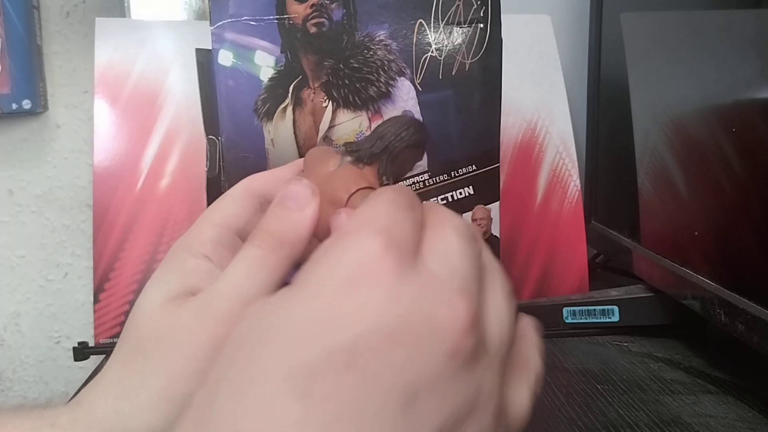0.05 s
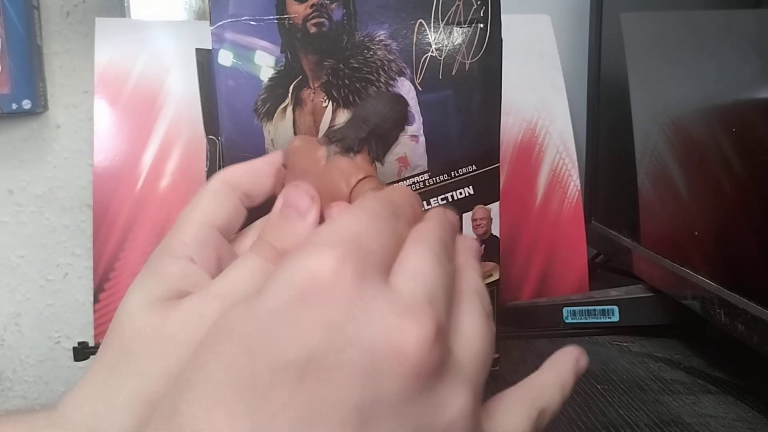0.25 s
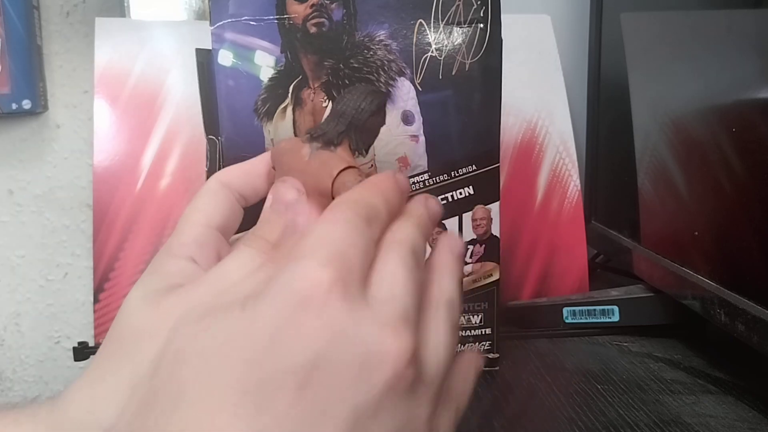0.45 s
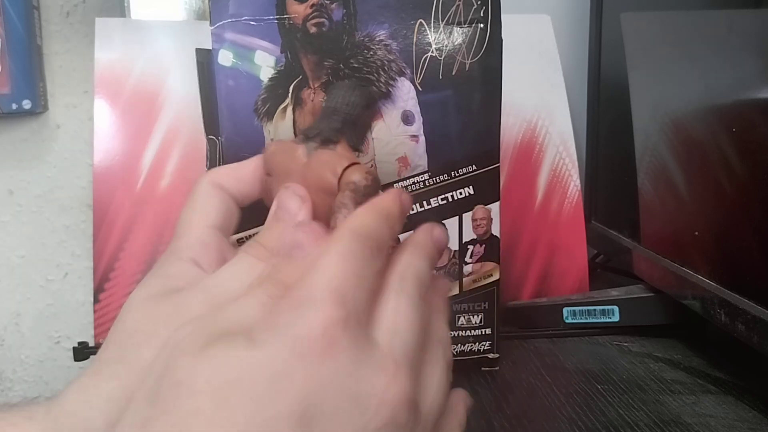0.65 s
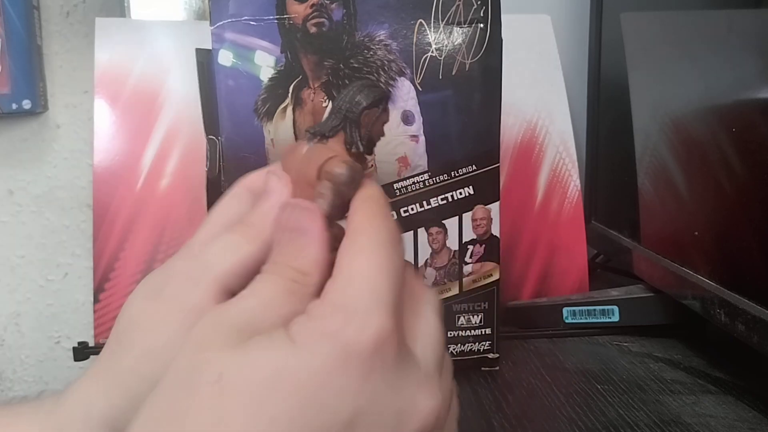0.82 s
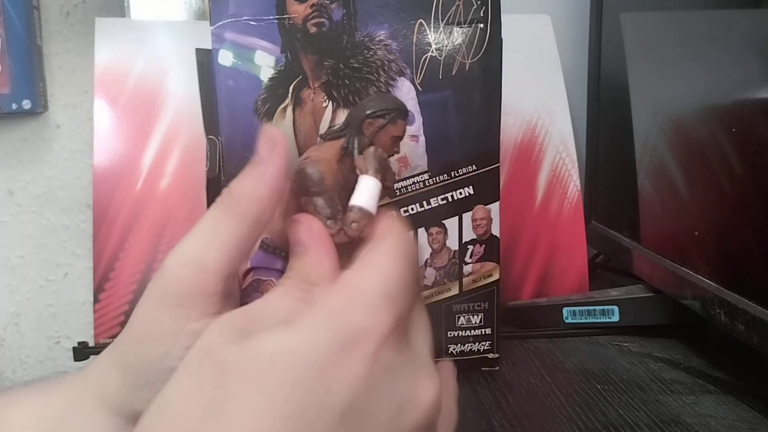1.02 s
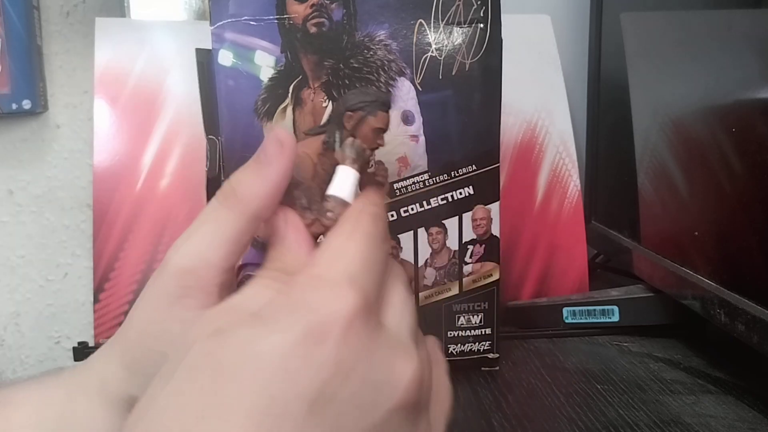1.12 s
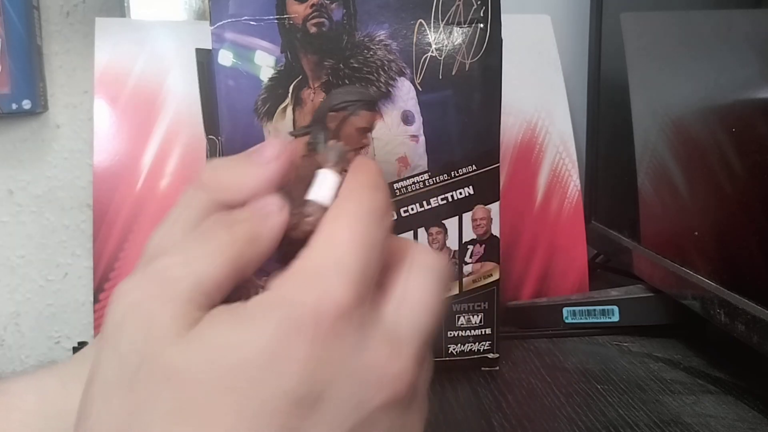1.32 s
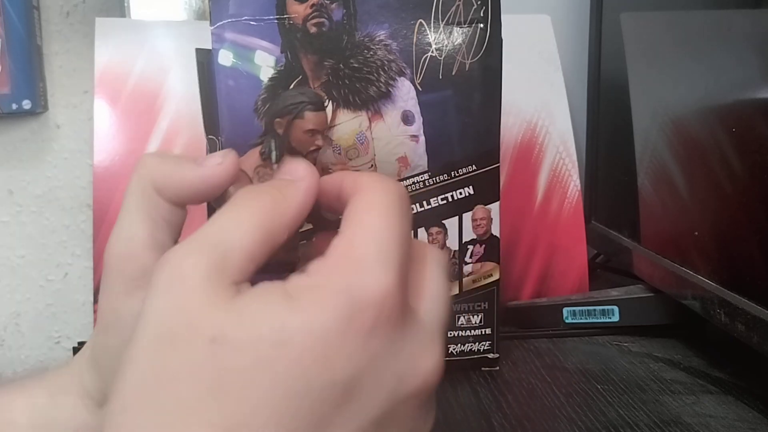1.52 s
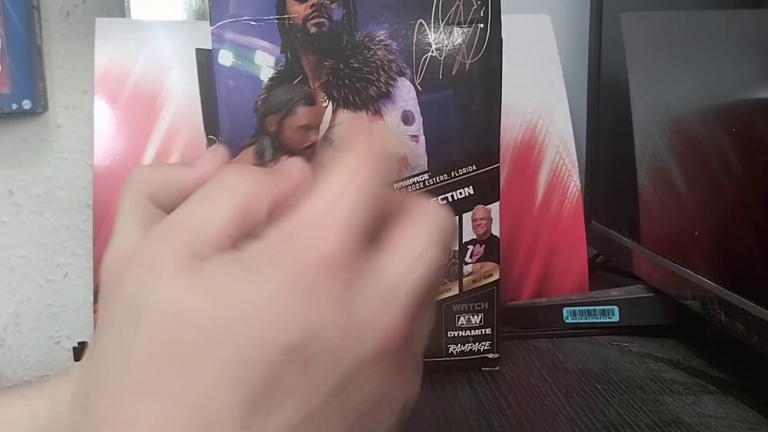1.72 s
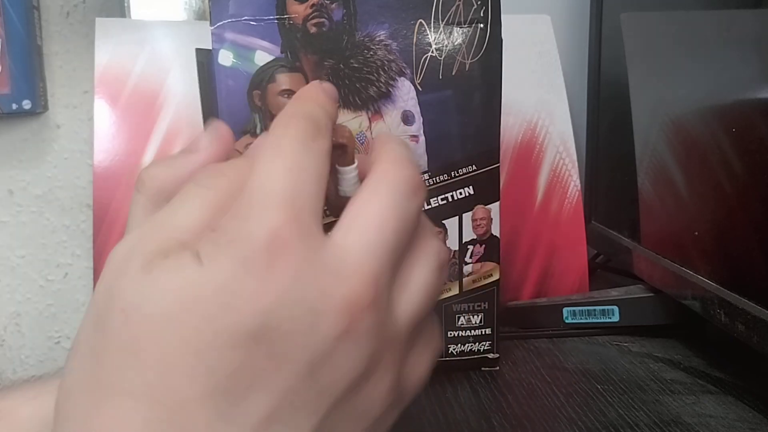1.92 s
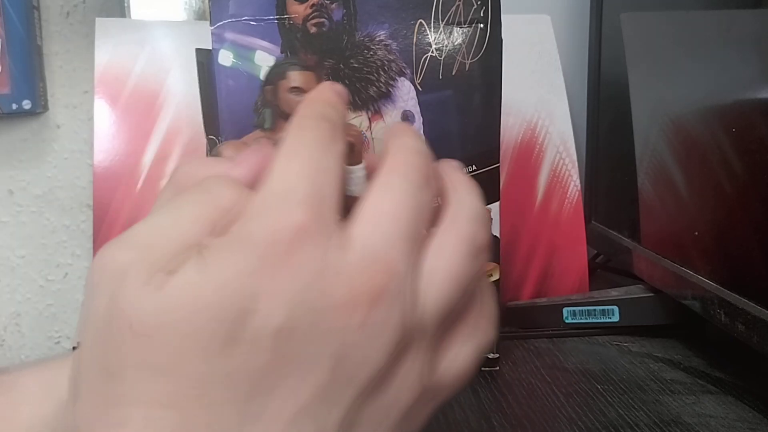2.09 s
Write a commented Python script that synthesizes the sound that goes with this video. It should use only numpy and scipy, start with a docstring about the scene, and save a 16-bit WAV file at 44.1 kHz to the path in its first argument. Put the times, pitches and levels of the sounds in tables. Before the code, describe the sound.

Plastic toy figure joints click sharply as hands turn them, with dull bumps on a desk

```python
"""Stiff joints of a plastic toy figure snap with short bright clicks as hands turn them in a small quiet room.
Each snap is four quick slips that set the figure's own pitches ringing. Hands and figure also bump the desk
just below, whose low modes reach the microphone through its stand. Fingers slide on the plastic as many tiny
slips, and something creaks faintly as a gliding tone. Feedback delays make the echo of the room, and
coloured noise makes the room rumble and microphone hiss underneath."""
import sys
import numpy as np
from scipy import signal
from scipy.fft import rfft, irfft, next_fast_len
from scipy.io import wavfile

SR = 44100
rng = np.random.default_rng(int(sys.argv[2]) if len(sys.argv) > 2 else 0)


def ratio_of_db(decibels):
    """Turn decibels (scalar or array-like) into linear amplitude factors; 0 dB maps to 1."""
    return 10 ** (np.asarray(decibels, float) / 20)


def waveform_to_disk(signal):
    """Save audio, clipped to [-1, 1], as 16-bit WAV at the path in sys.argv[1]."""
    frames = np.transpose(np.atleast_2d(signal))
    scaled = np.clip(frames, -1, 1) * 32767
    samples = np.round(scaled).astype(np.int16)
    wavfile.write(sys.argv[1], SR, samples)


N = 94815  # length of the scene [samples]


def rms_one(x):
    """Scale a sound to an rms (average strength) of 1."""
    return x / np.sqrt(np.mean(x ** 2) + 1e-20)


def in_time(rows):
    """Read a level curve at every sample, with straight lines between its points."""
    times_s, levels_db = np.transpose(rows)
    return np.interp(np.arange(N) / SR, times_s, levels_db)


def at_hz(points, hz):
    """Read a curve over frequency, with straight lines on a logarithmic frequency scale."""
    curve_hz, values = np.transpose(points)
    return np.interp(np.log(hz), np.log(curve_hz), values)


def ring(force, hz, t60):
    """A mode is a dying sine: a unit impulse starts it at height 1 and it falls 60 dB in t60 seconds."""
    decay = ratio_of_db(-60 / (t60 * SR))
    turn = 2 * np.pi * hz / SR
    return signal.lfilter([0, np.sin(turn)], [1, -2 * decay * np.cos(turn), decay * decay], force + 1e-18)


# how far high modes, and low ones, reach one microphone late [cycles]: more so through the air
EAR_SHIFT_CYCLES, STAND_SHIFT_CYCLES, AIRBORNE_HZ = 0.15, 0.024, 500


def strike(at, shapes, hz, t60, shift):
    """Lay pushes down at their samples and ring one mode, which reaches one microphone a little late."""
    force = np.zeros(N + 2000)
    np.add.at(force, at, shapes)
    ringing = ring(force[:N], hz, t60)
    cycles = EAR_SHIFT_CYCLES if hz > AIRBORNE_HZ else STAND_SHIFT_CYCLES
    lag = shift * SR / hz * cycles / 2  # half on each side
    n = np.arange(N)
    return np.array([np.interp(n - lag, n, ringing), np.interp(n + lag, n, ringing)])


def grains(per_s, spread_db, shape):
    """Tiny impulses at random moments, with uneven sizes and either sign."""
    sizes_db = spread_db * np.minimum(rng.exponential(1, shape), 4)
    sizes = ratio_of_db(sizes_db) * rng.choice([-1, 1], shape)
    return sizes * (rng.random(shape) < per_s / SR)


# how alike left and right are: (frequency [Hz], likeness [1 = the same, 0 = unrelated])
LIKENESS = [(60, 0.45), (800, 0.11), (8000, 0.4)]


def colour(white, spectrum):
    """Half-octave bands of noise, each with its own level and left-right likeness, scaled to rms 1."""
    out = 0
    edges_hz = 22 * 2 ** np.arange(0, 9.9, .5)
    for k, (low, high) in enumerate(zip(edges_hz, edges_hz[1:])):
        band = signal.butter(2, [low, high], "band", fs=SR, output="sos")
        mid, side = signal.sosfilt(band, white[k % 2])  # neighbouring bands use separate noise
        hz = np.sqrt(low * high)
        alike = np.clip(at_hz(LIKENESS, hz), -1, 1)
        stereo = np.sqrt(1 + alike) * mid + np.sqrt(1 - alike) * side * [[1], [-1]]
        out = out + ratio_of_db(at_hz(spectrum, hz)) * stereo
    return rms_one(out)


# colour of the rumble and hiss: (frequency [Hz], relative level [dB per Hz])
FLOOR = [(25, -28), (70, 7), (500, 0), (1980, -14.5), (12600, -23), (16500, 1.5)]
FLOOR_DB = -66  # ahead of the microphone's filters


def rumble_and_hiss():
    """Room rumble and microphone hiss: steady random noise, coloured band by band."""
    return ratio_of_db(FLOOR_DB) * colour(rng.standard_normal((2, 2, N)), FLOOR)


ROOM_T60_S, WALL_CUT_HZ, ROOM_LOW_HZ = 0.14, 15000, 400


def room(x):
    """Sound goes round fourteen feedback delays a side, weaker and duller on every round."""
    x = signal.sosfilt(signal.butter(4, ROOM_LOW_HZ, "high", fs=SR, output="sos"), x)
    size = next_fast_len(N + SR)
    delay_one = np.exp(-2j * np.pi * np.arange(size // 2 + 1) / size)  # one sample late
    dull = np.exp(-2 * np.pi * WALL_CUT_HZ / SR)
    answer = np.zeros((2, len(delay_one)), complex)
    lags = (rng.uniform(0.0037, 0.026, 28) * SR).astype(int)  # from delays in seconds
    for k, lag in enumerate(lags):
        loss = ratio_of_db(-60 * lag / SR / ROOM_T60_S)
        loop = loss * (1 - dull) / (1 - dull * delay_one) * delay_one ** lag
        answer[k % 2] += loop / (1 - loop) * (-1) ** (k // 2)
    return irfft(rfft(x, size) * answer, size)[:, :N]


# a faint low creak: (time [s], pitch [Hz], level [dB])
CREAK_PATH = [(1.201, 495, -115), (1.281, 461.4, -62), (1.404, 441.6, -91), (1.432, 400, -49.5),
              (1.491, 390, -67.5)]


def creak():
    """A faint sine whose pitch and level glide from point to point."""
    times_s, pitches_hz, levels_db = np.transpose(CREAK_PATH)
    t = np.arange(N) / SR
    level_db = np.interp(t, times_s, levels_db, left=-200, right=-200)
    phase = 2 * np.pi * np.cumsum(np.interp(t, times_s, pitches_hz)) / SR
    return ratio_of_db(level_db) * np.sin(phase)


# colour of skin sliding on plastic: (frequency [Hz], relative level [dB per Hz])
SLIDE_COLOUR = [(500, 6.5), (1400, 3.5), (3500, -6.5), (7000, -9.5), (12000, -39)]
# fingers sliding on plastic: (start [s], length before the fall [s], level [dB])
SLIDES = [(0.001, 0.27, -67), (0.313, 0.0037, -44.5), (0.454, 0.064, -65), (0.736, 0.012, -50.5),
          (1.478, 0.011, -57), (1.725, 0.2, -62), (1.826, 0.026, -52.5), (1.958, 0.058, -65.5)]
SLIPS_PER_S, SLIP_SPREAD_DB = 1300, 1
SLIDE_RISE_S, SLIDE_FALL_S = 0.001, 0.014


def fingers():
    """Skin slips on plastic in dense tiny jerks; each slide rises, holds and dies away."""
    t = np.arange(N) / SR
    stroke = 0
    for start_s, length_s, level_db in SLIDES:
        rise = np.clip((t - start_s) / SLIDE_RISE_S, 0, 1)
        fall = np.exp(-np.clip(t - start_s - length_s, 0, None) / SLIDE_FALL_S)
        stroke = stroke + ratio_of_db(level_db) * rise * fall
    slips = grains(SLIPS_PER_S, SLIP_SPREAD_DB, (2, 2, N))
    return colour(slips, SLIDE_COLOUR) * stroke


# bumps on the desk: (time [s], deep level [dB], knock level [dB], pitch the knock gathers around [Hz])
BUMPS = [(0.032, -53, -41, 215), (0.064, -46, -37, 242), (0.168, -24, -49.5, 297), (0.235, 0, -27, 305),
         (0.312, -6.5, -33, 230), (0.461, -18, -27, 301), (0.5795, -37, -18, 191), (0.6041, -14, -20, 288),
         (0.739, -42, -41.5, 288), (0.764, -48, -32.5, 127), (0.7945, -18, -31, 493),
         (0.875, -60, -38, 272), (0.923, -53, -45, 400), (1.021, -65, -40.5, 320),
         (1.154, -29.5, -36.5, 347), (1.48, -13, -40, 196), (1.62, -14, -55, 160), (1.661, -16.5, -59, 500),
         (1.737, -30, -44, 150), (1.755, -18, -31.5, 300), (1.817, -31, -38, 280), (1.832, -27.5, -36, 234),
         (2.078, -55, -47, 244)]
# the deepest mode of the desk: (pitch [Hz], relative level [dB], time to fall 60 dB [s])
DEEP_MODES = [(86, 0.5, 0.082)]
# the knocking modes of the desk: (pitch [Hz], relative level [dB], time to fall 60 dB [s])
KNOCK_MODES = [(124.6, -1.5, 0.089), (235.2, -10.5, 0.15), (284.8, 1, 0.032), (427.2, -1.5, 0.039),
               (568, -8.5, 0.046), (770, 0.5, 0.028), (1100, -5, 0.07)]
# restless pressing of the hands on the desk: (time [s], level [dB])
PRESSING = [(0, -65.5), (.5, -59.5), (.77, -44.5), (.85, -54.5), (1.3, -63.5), (2.0, -65), (2.15, -59.5)]
PRESS_PER_S, PRESS_CUT_HZ = 140, 360
DEEP_SWELL_S, CONTACT_CYCLES = 0.025, 0.38  # t60 of the mode that drives the deep one; contact time
DESK_SPREAD_DB, KNOCK_FALL_DB = 4, 4.5  # random spread; fall-off per octave squared


def desk():
    """Rounded pushes ring the desk, the deepest mode swelling through a like mode; small presses fill gaps."""
    times_s, deep_db, knock_db, knock_hz = np.transpose(BUMPS)
    modes = DEEP_MODES + KNOCK_MODES
    soften = signal.butter(2, PRESS_CUT_HZ, fs=SR, output="sos")
    presses = signal.sosfilt(soften, grains(PRESS_PER_S, 0.5, N) + 1e-18)
    spread = rng.standard_normal((len(times_s), len(modes)))
    shift = rng.choice([-1, 1], len(modes))
    n = np.arange(2000)
    at = (times_s * SR).astype(int)[:, None] + n
    u = n / SR * knock_hz[:, None] / CONTACT_CYCLES  # a lower knock has a longer contact
    push = u * np.exp(-2 * np.pi * u)
    push = -push / push.sum(1, keepdims=True)
    blows = restless = 0
    for k, (hz, mode_db, t60) in enumerate(modes):
        if k < len(DEEP_MODES):
            shape = ring(push, hz, DEEP_SWELL_S) * hz / SR
            bump_db = deep_db
        else:
            shape = push
            bump_db = knock_db - KNOCK_FALL_DB * np.log2(hz / knock_hz) ** 2
        gain_db = bump_db + mode_db + DESK_SPREAD_DB * spread[:, k]
        blows = blows + strike(at, shape * ratio_of_db(gain_db)[:, None], hz, t60, shift[k])
        restless = restless + ratio_of_db(mode_db) * ring(presses, hz, t60)
    return blows + rms_one(restless) * ratio_of_db(in_time(PRESSING))


# joint clicks: (time [s], level [dB], centre of colour [Hz],
# fall-off, sign ignored [dB per octave squared], pitch of the part that sings out [Hz])
CLICKS = [(0.031,-36,1940,42,2650), (0.166,-31,2950,3,1780), (0.2321,-17.5,4350,5.5,6400),
          (0.3149,-40,3440,27,4110), (0.4622,-36,2370,22,2550), (0.5772,-36.5,3300,-8,3370),
          (0.5805,-31,9000,11,8500), (0.603,-26,7700,1.5,3370), (0.796,-33,4330,4,5350),
          (0.9422,-51.5,1740,2.5,1366), (1.1169,-48,2540,21,2650), (1.728,-51.5,7030,32,6400),
          (1.754,-31.5,2300,2,1780), (1.809,-50,1300,42,1330), (1.809,-44,6500,20,6400),
          (1.9695,-44,2460,5.5,1780), (2.1405,-43.5,1680,59,1780)]
# modes of the figure: (pitch [Hz], relative level [dB], time to fall 60 dB [s])
FIGURE_MODES = [(1330, 4, 0.0064), (1780, -1.5, 0.0037), (2550, -2, 0.0047), (3370, -0.5, 0.0076),
                (4110, -5, 0.0023), (5350, -7, 0.008), (6400, 6, 0.0027), (7410, 6.5, 0.0016),
                (9970, 9, 0.0021), (11460, 3, 0.0034), (13900, 2.5, .002)]
SNAP_S, SLIP_FADE = 0.0015, 0.6  # longest wait before each slip; strength of a slip against the last one
MODE_SPREAD_DB, SING_DB, LEFT_DB = 3, 4, 2.05  # random spread; lift of the singing mode; left over right


def joints():
    """In each snap every mode is struck by four slips within a few milliseconds, with a strength of its own."""
    times_s, click_db, centre_hz, fall, sing_hz = np.transpose(CLICKS)
    mode_hz = np.array(FIGURE_MODES)[:, 0]
    sings = np.abs(np.log(mode_hz / sing_hz[:, None])).argmin(axis=1)  # the nearest mode sings out
    spread = rng.standard_normal((len(times_s), len(mode_hz)))
    waits = rng.random((len(times_s), len(mode_hz), 4))
    shift = rng.choice([-1, 1], len(mode_hz))
    slips = SLIP_FADE ** np.arange(4)
    out = 0
    for k, (hz, mode_db, t60) in enumerate(FIGURE_MODES):
        colour_db = SING_DB * (sings == k) - np.abs(fall) * np.log2(hz / centre_hz) ** 2
        gain_db = click_db + mode_db + colour_db + MODE_SPREAD_DB * spread[:, k]
        slip_s = times_s[:, None] + SNAP_S * np.cumsum(waits[:, k], axis=1)
        at = (slip_s * SR).astype(int)
        # how the slips add up in this mode; used to even out its strength
        total = np.abs((slips * np.exp(2j * np.pi * hz * at / SR)).sum(1))
        strength = ratio_of_db(gain_db) / np.sqrt(total + 0.74)
        out = out + strike(at, strength[:, None] * slips, hz, t60, shift[k])
    return out * ratio_of_db(np.array([[LEFT_DB / 2], [-LEFT_DB / 2]]))


ROOM_DB, DESK_ROOM_DB = -14, -13  # how much of the clicks and of the desk goes into the room


def scene():
    """Add up the figure, desk, room echo, fingers, creak, rumble and hiss."""
    clicks = joints()
    thumps = desk()
    echo = room(ratio_of_db(ROOM_DB) * clicks[0] + ratio_of_db(DESK_ROOM_DB) * thumps[0])
    floor = rumble_and_hiss()
    thumps_leaning_left = thumps * ratio_of_db(np.array([[.7], [0]]))  # left and right [dB]
    return clicks + thumps_leaning_left + echo + fingers() + creak() + floor


def roll_off(x):
    """The treble ends steeply here."""
    return signal.sosfilt(signal.butter(12, 16820, fs=SR, output="sos"), x)


MIC_LOW_HZ, CUTOFF_HZ = 64.6, 16750


def record(dry):
    """The microphone loses the deepest bass, and the top is cut."""
    no_bass = signal.sosfilt(signal.butter(4, MIC_LOW_HZ, "high", fs=SR, output="sos"), dry)
    mix = signal.sosfilt(signal.cheby2(10, 50, CUTOFF_HZ, fs=SR, output="sos"), no_bass)
    return roll_off(mix)


dry = scene()
out = record(dry)
waveform_to_disk(out)
```